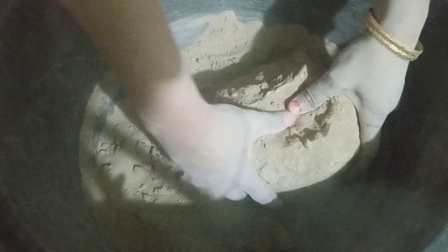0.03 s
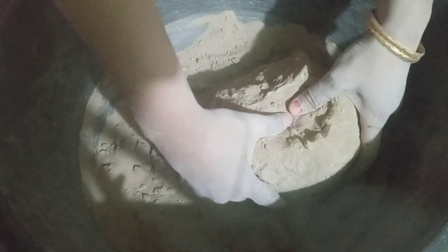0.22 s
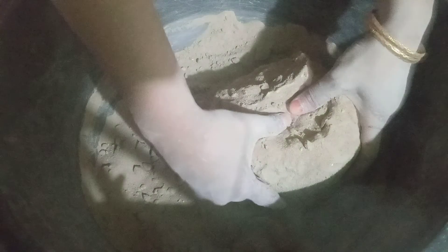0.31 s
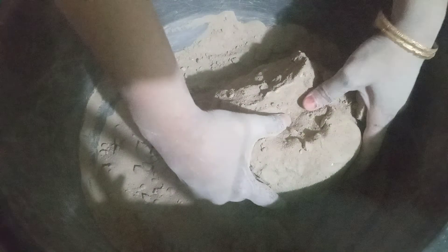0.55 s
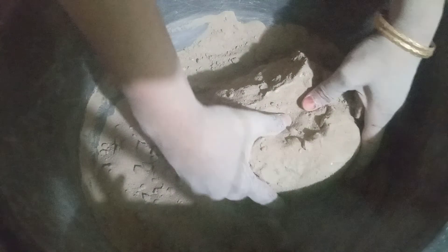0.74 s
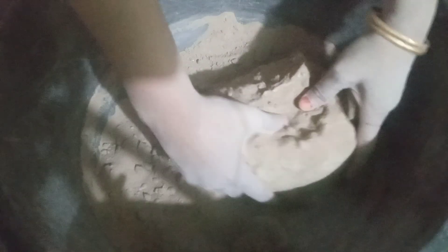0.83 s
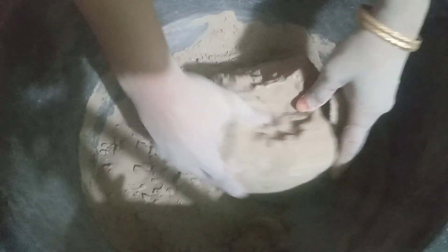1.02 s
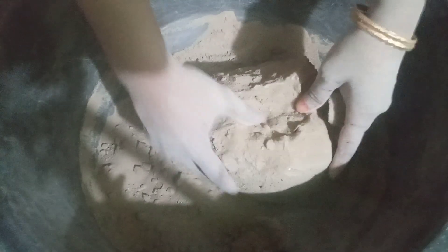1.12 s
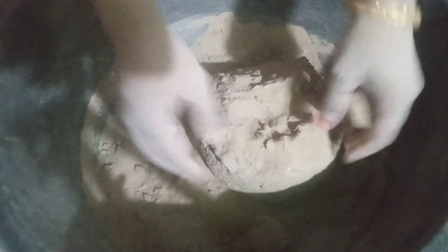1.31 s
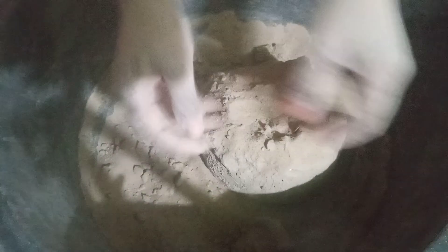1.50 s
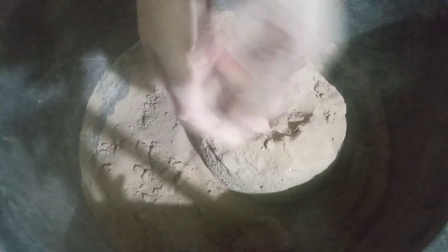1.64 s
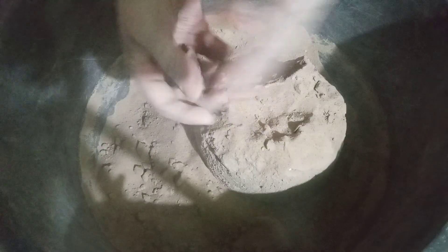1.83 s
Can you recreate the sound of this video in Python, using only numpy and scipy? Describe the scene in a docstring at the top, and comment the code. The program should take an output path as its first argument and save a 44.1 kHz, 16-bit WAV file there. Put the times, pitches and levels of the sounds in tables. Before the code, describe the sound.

Dry sand breaking in a tub: gritty crunch, dull thuds, hollow knock, then trickling grains

```python
"""Quiet room, close by: hands break a block of dry sand in a plastic tub.
Thuds are filtered pushes through tub modes; cracks are gritty bursts with a bright snap.
Lumps knock as swelling, dying modes; crumbs tick as short coloured bursts with a wall echo.
Loose sand sifts as random coloured grains; finger strokes gate a faint rustle as it dies away.
Steady low noise is the room's rumble; a short dull tail follows the sand sounds."""
import sys
import numpy as np
from scipy import signal
from scipy.io import wavfile
from scipy.ndimage import uniform_filter1d, map_coordinates

SR = 44100
rng = np.random.default_rng(int(sys.argv[2]) if len(sys.argv) > 2 else 0)


def output_pcm(signal):
    """Save a mono or channel-first signal as 16-bit PCM at the path in sys.argv[1].

    Samples are clipped to [-1, 1] before scaling.
    """
    pcm = np.clip(np.atleast_2d(signal).T, -1, 1) * 32767
    wavfile.write(sys.argv[1], SR, np.round(pcm).astype(np.int16))


N = 81585


def amp(db):
    """Decibels to gain."""
    return 10 ** (np.asarray(db) / 20)


def unit(x):
    """Scales to an energy of one."""
    return x / np.sqrt(np.sum(x ** 2) + 1e-20)


def evened(x):
    """Scales to an rms of one."""
    return unit(x) * np.sqrt(len(x))


def level(points):
    """Gain over time from (t/s, level/dB) points."""
    t_s, level_db = np.transpose(points)
    return amp(np.interp(np.arange(N) / SR, t_s, level_db))


def add(mix, start_s, sound):
    """Mixes a sound in at start_s, cut at the end of the mix."""
    part = mix[max(round(start_s * SR), 0):][:len(sound)]
    part += sound[:len(part)]


def through(x, response):
    """Passes a sound through an impulse response."""
    return signal.fftconvolve(x, response)[:len(x)]


def colour(points, size=8192):
    """Causal (minimum-phase) impulse response of unit energy from (f/Hz, level/dB) points."""
    hz, db = np.transpose(points)
    bin_hz = abs(np.fft.fftfreq(size, 1 / SR))
    log_gain = np.log(amp(np.interp(np.log(bin_hz + 1), np.log(hz), db)))
    # Hilbert transform of the log gain gives the minimum phase
    spectrum = np.exp(np.conj(signal.hilbert(log_gain)))
    return unit(np.fft.ifft(spectrum).real[:size // 2])


def dull(x, hz, order=2):
    """Low-pass."""
    return signal.sosfilt(signal.butter(order, min(hz, SR / 2 - 1), fs=SR, output="sos"), x)


def thin(x, hz, order=2):
    """High-pass."""
    return signal.sosfilt(signal.butter(order, hz, "highpass", fs=SR, output="sos"), x)


def modes(table):
    """Sum of exponentially dying sines from (f/Hz, level/dB, t60/s) rows."""
    t = np.arange(SR // 2) / SR
    return sum(amp(db) * np.exp(-np.log(1000) * t / t60_s) * np.sin(2 * np.pi * hz * t)
               for hz, db, t60_s in table)


def burst(decay_s, scatter_share, size=4096):
    """One contact plus a quickly dying scatter of tiny ones; scatter_share is its energy share."""
    scatter_share = np.clip(scatter_share, 0, 1)
    decay = np.exp(-np.arange(size) / SR / decay_s)
    x = np.sqrt(scatter_share) * unit(rng.standard_normal(size) * decay)
    x[0] += np.sqrt(1 - scatter_share)
    return x


RUMBLE_RMS_DB = -59
# room noise colour: f/Hz, level/dB
RUMBLE_COLOUR = [(18, -74), (32, -37), (62, -7.5), (140, 3.5), (200, -3.5), (310, -6.5), (430, -15.5),
                 (600, -20.5), (820, -47), (1500, -49), (3200, -63.5), (8000, -58), (16000, -57)]


def rumble():
    """Steady low background of the room: coloured noise."""
    noise = rng.standard_normal(2 * N)
    # second half: filter onset skipped
    return amp(RUMBLE_RMS_DB) * evened(through(noise, colour(RUMBLE_COLOUR))[N:])


ROOM_DB, ROOM_T60_S, ROOM_EDGE_HZ, ROOM_RISE_S = -17.5, 0.17, 2500, 0.0017


def room(x):
    """Short, dull tail: exponentially dying noise, low-passed."""
    t = np.arange(SR // 2) / SR
    envelope = np.exp(-np.log(1000) * t / ROOM_T60_S) * np.minimum(t / ROOM_RISE_S, 1)
    tail = unit(rng.standard_normal(len(t)) * envelope)
    return amp(ROOM_DB) * through(x, dull(tail, ROOM_EDGE_HZ))


WALL_ECHO_S, WALL_ECHO_DB = 0.0013, -18.5


def wall(x):
    """The tub's side throws back a quick echo."""
    out = x.copy()
    add(out, WALL_ECHO_S, amp(WALL_ECHO_DB) * x)
    return out


PATCH_RMS_DB, PATCH_S, PATCH_HZ = 1.6, 0.04, 300


def patchy(x):
    """The colour drifts at random as the grains land on changing spots."""
    hz, t, z = signal.stft(x, SR, nperseg=512, noverlap=384)
    place = np.meshgrid(hz / PATCH_HZ, t / PATCH_S, indexing="ij")
    drift = map_coordinates(rng.standard_normal((128, 128)), place, order=1, mode="mirror")
    drift_db = PATCH_RMS_DB * drift / drift.std()
    return signal.istft(z * amp(drift_db), SR, nperseg=512, noverlap=384)[1][:N]


CLUMP_RMS_DB = 1.16
# a few crumbs at first, then a stream: t/s, rate/(grains/s)
GRAIN_RATE = [(.6, 700), (.76, 5000)]


def grains(spectrum, spread_db):
    """Clumpy shower of grains: random impulses of many sizes, coloured, rms of one."""
    rate = np.interp(np.arange(N) / SR, *np.transpose(GRAIN_RATE))
    size_db = spread_db * np.minimum(rng.exponential(1, N), 4)
    # 1/sqrt(rate) keeps the power independent of density
    sizes = amp(size_db) * rng.choice([-1, 1], N) / np.sqrt(rate)
    clumps = amp(CLUMP_RMS_DB * evened(uniform_filter1d(rng.standard_normal(N), size=400)))
    landed = rng.random(N) < rate / SR
    return evened(patchy(through(sizes * clumps * landed, colour(spectrum))))


FINE_SPREAD_DB, COARSE_SPREAD_DB, LIGHT_SPREAD_DB = 0.5, 3.5, 1
RUB_DB, RUB_T60_S = -12, 0.0077  # rub level relative to the rustle
# finger strokes: t/s, level/dB, Gaussian half length/s, rubbing band f/Hz
BRUSHES = [(1.43, -79, 0.047, 3000), (1.492, -88.5, .014, 3200), (1.532, -71, 0.0099, 4700),
           (1.565, -77, .023, 5000), (1.592, -70, 0.0034, 5110), (1.653, -80, .031, 6670),
           (1.8, -79.5, .016, 4650)]
# rustle colour: f/Hz, level/dB
RUSTLE_COLOUR = [(500, -47.5), (2500, -26), (3800, -15), (4700, -0.5), (6700, 3.5), (8300, -21),
                 (10300, 2.5), (13400, 0), (15200, 15.5), (16300, 3.5)]


def brushes():
    """Fingers rustle over what is left: gated grains plus noise through a band of rubbing."""
    out, t = np.zeros(N), np.arange(N) / SR
    rustle = grains(RUSTLE_COLOUR, FINE_SPREAD_DB)
    for centre_s, db, half_s, hz in BRUSHES:
        resonance = np.diff(modes([(hz, 0, RUB_T60_S)]))
        rub = evened(through(rng.standard_normal(N), resonance))
        stroke = np.exp(-((t - centre_s) / half_s) ** 2 / 2)
        out += amp(db) * stroke * (rustle + amp(RUB_DB) * rub)
    return out


# coarse grains, flow: t/s, level/dB
COARSE_FLOW = [(.19, -90.5), (.205, -46), (.232, -73), (.255, -50), (.28, -49.5), (.35, -53), (.395, -62.5),
               (.42, -57.5), (.47, -61.5), (.54, -72), (.59, -66), (.735, -65), (.765, -50.5), (.795, -49),
               (.806, -57), (.835, -46.5), (.875, -57), (.902, -48), (.95, -50), (1.005, -55), (1.035, -66),
               (1.15, -101)]
# coarse grains, colour: f/Hz, level/dB
SAND_COLOUR = [(100, -23), (330, -3), (400, -7.5), (490, -2.5), (580, 6), (635, 2), (720, -3), (1120, -8.5),
               (1290, -3), (1500, -3.5), (1680, -7.5), (1850, 0), (2060, -9), (2700, -10), (4000, -20.5),
               (6500, -30.5), (8200, -32.5), (16000, -45)]
# light crumbs, flow: t/s, level/dB
LIGHT_FLOW = [(0, -80.5), (.055, -74), (.08, -102), (.19, -79), (.21, -55.5), (.34, -77), (.395, -76),
              (.43, -71), (.49, -62), (.53, -100), (.59, -82), (.645, -63), (.7, -81), (.92, -55),
              (1.06, -68.5), (1.16, -70.5), (1.225, -75), (1.27, -90), (1.48, -88.5), (1.62, -90.5),
              (1.85, -92.5)]
# light crumbs, colour: f/Hz, level/dB
TRICKLE_COLOUR = [(300, -24.5), (580, 5), (760, -11), (980, 0.5), (1300, 2.5), (1700, -3), (2050, -0.5),
                  (3200, -8), (4500, -15), (6600, -12), (8300, -21.5), (16000, -27.5)]
# fine dust, flow: t/s, level/dB
FINE_FLOW = [(0, -78), (.19, -87), (.205, -56), (.23, -45.5), (.255, -45), (.275, -65), (.32, -55),
             (.365, -62), (.39, -66), (.435, -64), (.455, -64), (.5, -80), (.54, -77), (.58, -65),
             (.61, -81), (.71, -56.5), (.8, -65.5), (.93, -56.5), (1.05, -59), (1.1, -70.5), (1.19, -73),
             (1.27, -85), (1.85, -91)]
# fizz of fine dust, ticks and snaps, colour: f/Hz, level/dB
FIZZ_COLOUR = [(300, -41), (3000, -27), (6500, -15.5), (8200, -22.5), (11000, -18), (13700, -19),
               (14700, -3.5), (15500, 4.5), (15900, 2.5), (16200, -23), (16900, -30.5)]


def sifting():
    """Coarse sand, light crumbs and fine dust run down: three grain showers with own levels."""
    coarse = level(COARSE_FLOW) * grains(SAND_COLOUR, COARSE_SPREAD_DB)
    light = level(LIGHT_FLOW) * grains(TRICKLE_COLOUR, LIGHT_SPREAD_DB)
    fine = level(FINE_FLOW) * grains(FIZZ_COLOUR, FINE_SPREAD_DB)
    return coarse + light + fine


TICK_DECAY_S, FIZZ_DECAY_S, TICK_SCATTER_SHARE = 0.0012, 0.0025, 0.54
# single crumbs: t/s, body level/dB, fizz level/dB
TICKS = [(0.0441, -38.5, -66), (0.1793, -33.5, -35.5), (0.201, -40, -20.5), (0.206, -35, -25),
         (0.2103, -31.5, -49), (0.2575, -24.5, -35.5), (0.257, -39, -21), (0.3055, -18.5, -39),
         (.3152, -44, -37), (0.3504, -22, -26), (.3733, -24.5, -21.5), (.4510, -29, -34.5),
         (.4643, -27.5, -28.5), (0.4883, -27.5, -24), (0.495, -29.5, -47), (0.505, -36.5, -31.5),
         (.5750, -25, -36), (.5790, -36, -37), (0.7568, -33.5, -53), (0.8345, -35, -53),
         (0.8563, -22.5, -24), (0.9422, -24.5, -30)]
# crumb body colour, also in snaps: f/Hz, level/dB
CRUMB_COLOUR = [(100, -23), (500, -20.5), (950, 10), (2100, 6.5), (3500, -1), (4700, -12.5), (6500, -17),
                (8300, -23), (12000, -23), (16500, -19)]


def ticks():
    """Crumbs snap off and land: a short body burst plus a fizz burst each."""
    out, crumb, fizz = np.zeros(N), colour(CRUMB_COLOUR), colour(FIZZ_COLOUR)
    for start_s, body_db, fizz_db in TICKS:
        body_burst = burst(TICK_DECAY_S, TICK_SCATTER_SHARE)
        fizz_burst = burst(FIZZ_DECAY_S, TICK_SCATTER_SHARE)
        add(out, start_s, amp(body_db) * unit(through(body_burst, crumb)))
        add(out, start_s, amp(fizz_db) * unit(through(fizz_burst, fizz)))
    return out


SNAP_BODY_DB = 3.5  # crumb colour relative to fizz


def snap():
    """Bright spray of grit that comes with a break: all scatter, no single contact."""
    spray_colour = colour(FIZZ_COLOUR) + amp(SNAP_BODY_DB) * colour(CRUMB_COLOUR)
    return unit(through(burst(FIZZ_DECAY_S, 1.0), spray_colour))


HUM_HZ, HUM_T60_S = 160, 0.2
# lumps knocking down: t/s, level/dB, pitch ratio, length ratio, snap level/dB, tub hum level/dB
KNOCKS = [(.2383, -7, 0.98, 1, -23, -29.5), (.24495, -4, 0.99, 1, -22.5, -30),
          (0.3351, -11.5, .9, 0.75, -20.5, -19.5), (0.4094, 1.5, 0.97, 0.81, -13, -12)]
# lump modes at ratios of 1: f/Hz, level/dB, time to peak/s
LUMP_MODES = [(229, -25.5, 0.014), (577, -8.5, 0.0016), (854, -3, 0.003), (1320, -23.5, 0.0078),
              (1580, -19, 0.0054), (2080, -9, 0.0022), (3128, -11.5, 0.0006), (5780, -28, 0.00098),
              (7200, -32.5, 0.0022)]


def knocks():
    """Hard lumps strike with a hollow ring, each mode swelling and dying; the tub hums on."""
    out, t = np.zeros(N), np.arange(SR // 8) / SR
    hum = unit(modes([(HUM_HZ, 0, HUM_T60_S)]))
    for start_s, db, pitch, length, snap_db, hum_db in KNOCKS:
        ring = 0
        for hz, mode_db, peak_s in LUMP_MODES:
            age = t / (peak_s * length)
            swell = (age * np.exp(1 - age)) ** 2
            ring = ring + amp(mode_db) * swell * np.sin(2 * np.pi * hz * pitch * t)
        add(out, start_s, amp(db) * unit(ring))
        add(out, start_s, amp(snap_db) * snap())
        add(out, start_s, amp(hum_db) * hum)
    return out


TUB_LOW_HZ = 48.5
# heavy pieces shifting against the tub: t/s, level/dB, upper edge f/Hz, tub ring gain/dB
THUDS = [(0.1983, -12.5, 110.7, -16), (0.2095, -6, 558.4, 7.5), (0.2412, -6, 300, 4.5),
         (0.2481, -2, 411, -10), (0.2529, 0, 178.4, -3.5), (0.2659, -4, 168.8, -0.5), (0.3008, 4, 560, 0),
         (0.3121, -6, 321.4, -19.5), (0.3368, -13, 141.6, -6.5), (0.4125, -23.5, 451, -19)]
# push colour: f/Hz, level/dB
THUD_COLOUR = [(20, -42.5), (50, -3.5), (80, 1.5), (180, 3), (330, -0.5), (600, -3.5), (800, -20.5),
               (1200, -16.5), (4000, -28)]
# low modes of the loaded tub, before differentiation: f/Hz, level/dB, t60/s
TUB_MODES = [(94.7, -35, 0.48), (199.4, -33, 0.052)]


def thuds():
    """Soft pushes set the tub's low modes going: low-passed pulses plus their modal ring."""
    out = np.zeros(N)
    push = np.pad(colour(THUD_COLOUR), (0, SR // 2))
    tub = np.diff(modes(TUB_MODES), prepend=0) * 2 * np.pi
    for start_s, db, edge_hz, ring_db in THUDS:
        blow = -amp(db) * unit(dull(push, edge_hz))
        add(out, start_s, blow + amp(ring_db) * through(blow, tub))
    return thin(out, TUB_LOW_HZ)


CRUMBLE_SHARE = 0.67  # scatter share of energy, before filtering
# the block cracking: t/s, level/dB, upper edge f/Hz, crumbling decay/s, snap level/dB
CRACKS = [(0.2385, -3, 7676, 0.0066, -14), (0.2428, -7, 7000, 0.0049, -12.5),
          (0.2466, -6.5, 3500, 0.0017, -16.5), (0.249, -11, 1898, 0.0022, -30.5),
          (0.2876, -15, 2200, 0.0008, -18.5), (0.2987, -19, 1793, 0.009, -18),
          (.3355, -12.5, 2040, 0.0025, -32.5), (.5528, -23.5, 8200, 0.0017, -46)]
# breaking grit colour: f/Hz, level/dB
GRIT_COLOUR = [(200, -7), (600, -10), (850, 1.5), (1080, -8.5), (1500, -3.5), (2150, 2.5), (2500, -6),
               (3700, -8), (4700, -15.5), (6400, -9.5), (9000, -23.5), (16000, -26)]


def cracks():
    """Each fracture is a dense run of tiny breaks, dry and gritty, with a bright snap."""
    out, grit = np.zeros(N), colour(GRIT_COLOUR)
    for start_s, db, edge_hz, crumble_s, snap_db in CRACKS:
        crumble = through(burst(crumble_s, CRUMBLE_SHARE), grit)
        add(out, start_s, amp(db) * unit(dull(crumble, edge_hz)))
        add(out, start_s, amp(snap_db) * snap())
    return out


def scene():
    """All the sand, its room and the background."""
    background = rumble()
    sand = brushes() + sifting() + wall(ticks()) + knocks() + thuds() + cracks()
    return (sand + room(sand) + background)[None]


CUTOFF_HZ = 16900


def record(dry):
    """Band limit: linear-phase low-pass."""
    low_pass = signal.firwin(511, CUTOFF_HZ, window=("kaiser", 9), fs=SR)
    return signal.oaconvolve(dry, low_pass[None], "same")


dry = scene()
out = record(dry)
output_pcm(out)
```